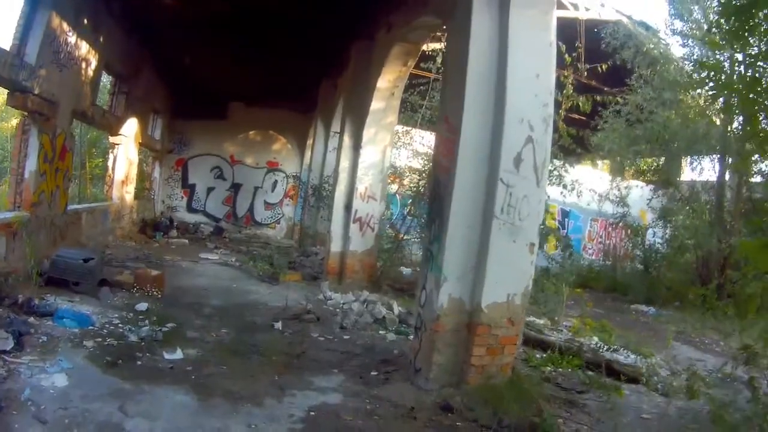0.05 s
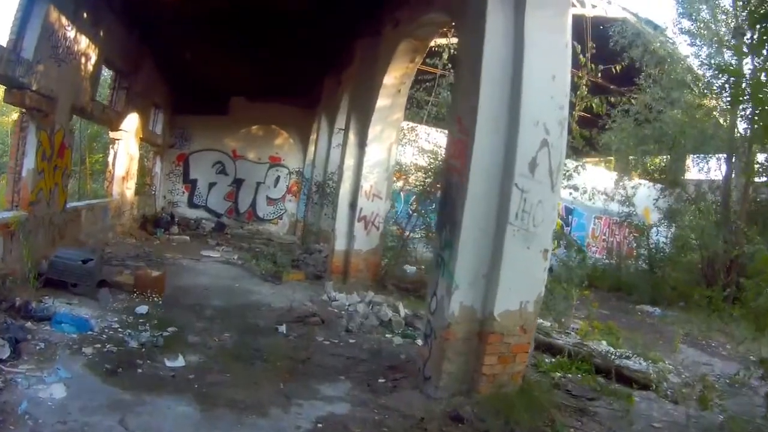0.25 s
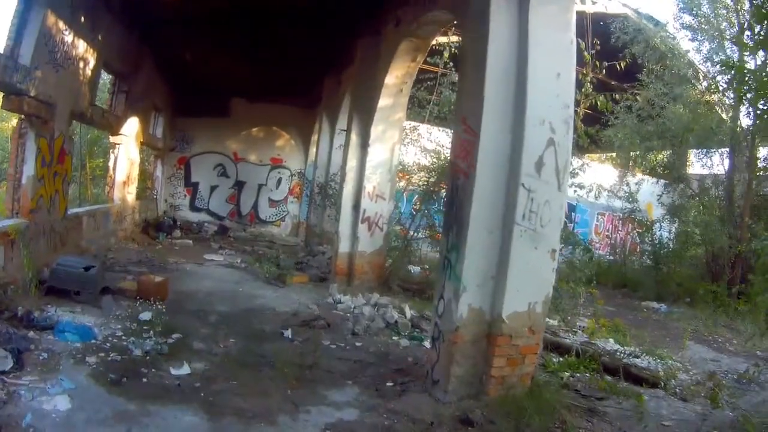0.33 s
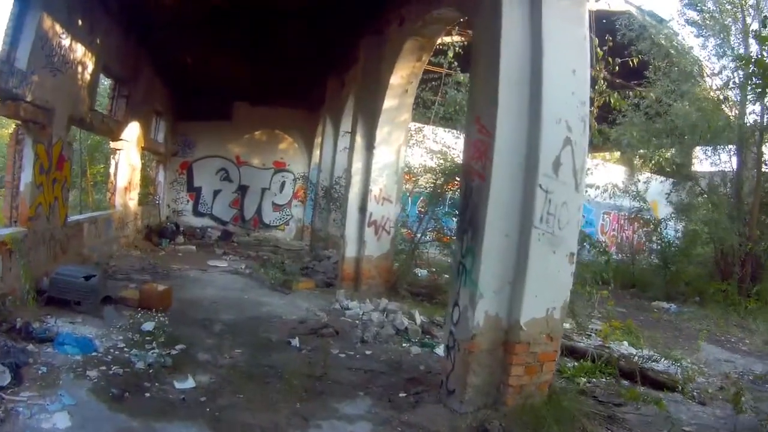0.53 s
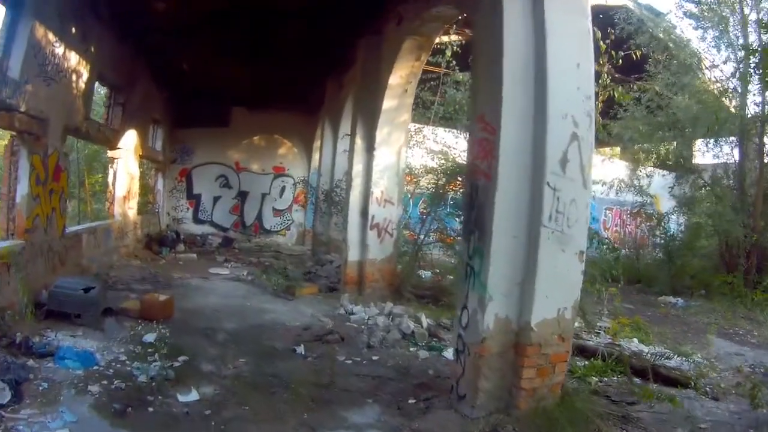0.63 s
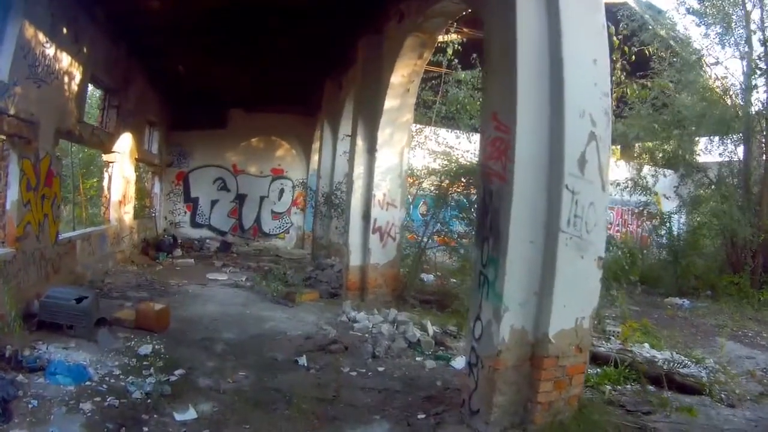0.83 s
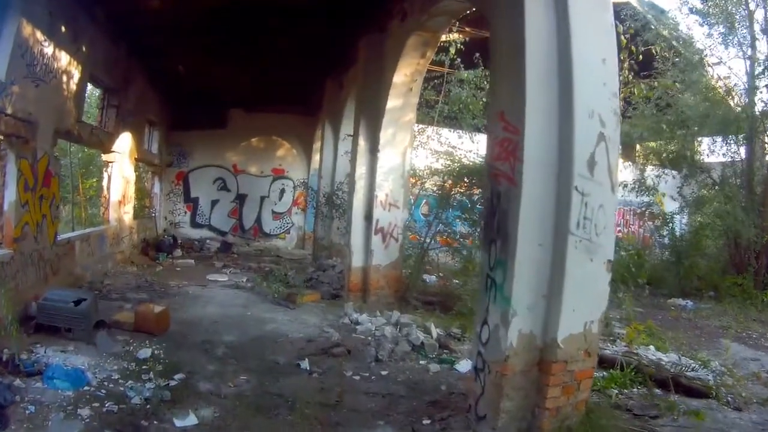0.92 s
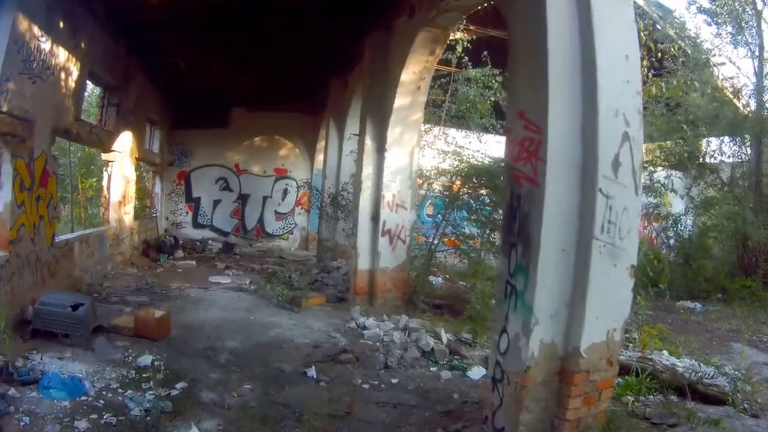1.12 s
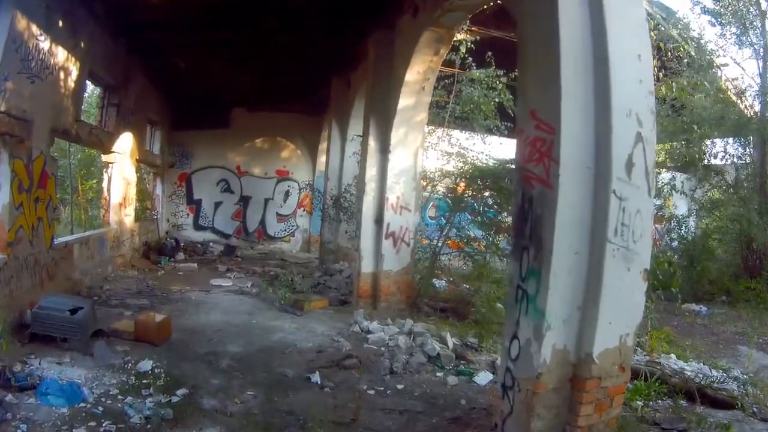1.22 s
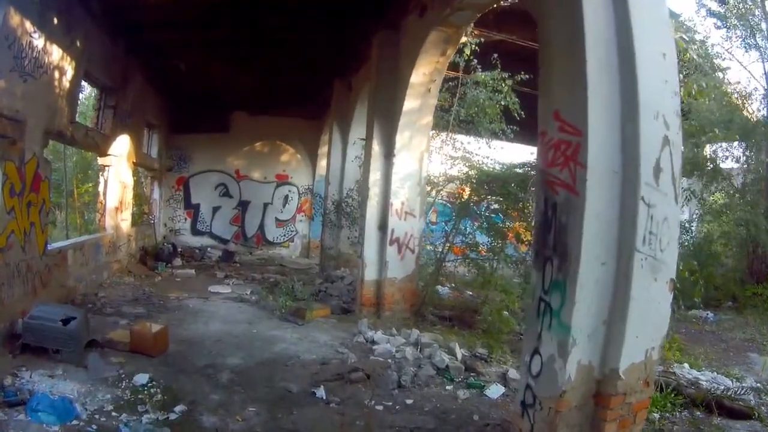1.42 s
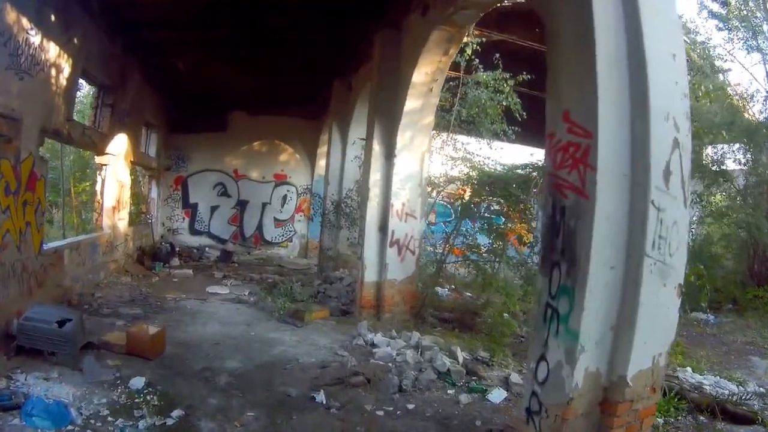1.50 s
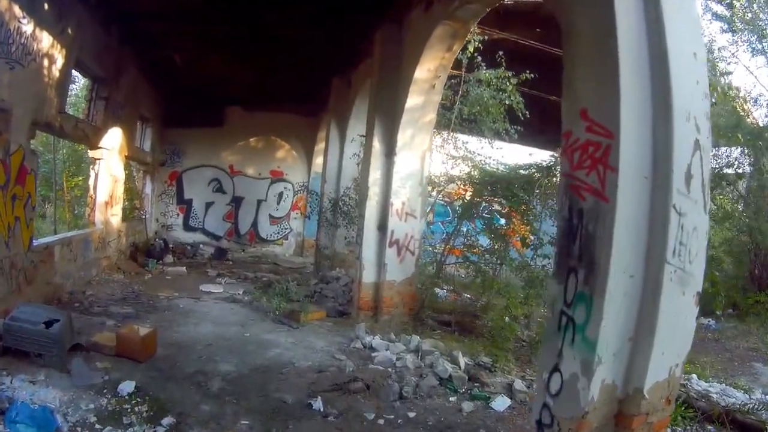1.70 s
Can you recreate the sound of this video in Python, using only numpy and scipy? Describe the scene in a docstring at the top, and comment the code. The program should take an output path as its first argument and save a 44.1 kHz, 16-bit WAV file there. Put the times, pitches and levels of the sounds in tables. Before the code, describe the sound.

A footstep scrapes over rubble and clinks a glass shard, then softer steps crunch.

```python
"""Slow steps over rubble

In a derelict brick hall, a sole scrapes through grit and flicks a glass shard, which clinks and
settles. Softer steps crush crumbs of mortar, each a tiny click, and the walls echo them.
A bird chirps thinly outside, over quiet air and a faint electronic whine."""
import sys
import numpy as np
from scipy import signal
from scipy.fft import rfft, irfft
from scipy.io import wavfile
from scipy.ndimage import uniform_filter1d

SR = 44100
rng = np.random.default_rng(int(sys.argv[2]) if len(sys.argv) > 2 else 0)


def inscribe(sig):
    """Save sig as 16-bit PCM at rate SR to the path in sys.argv[1].

    A 1-D sig is mono; a 2-D sig holds one channel per row.
    Samples are clipped to [-1, 1] before scaling.
    """
    pcm = np.round(np.clip(np.atleast_2d(sig).T, -1, 1) * 32767)
    wavfile.write(sys.argv[1], SR, pcm.astype(np.int16))


N = 77175

# A tone table says how strong each pitch is. A fade_s is the time to fall by 60 dB.
# tone of the air: pitch_hz, gain_db
AIR_TONE = [(10, -25), (18, 0), (45, -2.5), (95, -2.5), (140, -7), (310, -12.5), (485, -16.5), (718, -15.5),
            (1260, -20.5), (1480, -21), (2200, -25), (7310, -27), (9140, -24.5), (12800, -28.5),
            (13900, -22.5), (16000, -28.5)]
# notes of the whine: pitch_hz, level_db
WHINE_NOTES = [(6857, -80.5), (13714, -70.5)]
# how hard the scraping sole presses: time_s, gain_db
SCRAPE_PRESSURE = [(0, 1.5), (.05, -3), (.11, 0.5), (.17, -2.5), (.21, -5), (.235, -10.5), (.25, -6.5),
                   (.3, -14.5), (.36, -13.5), (.4, -17.5), (0.451, -26), (.54, -40)]
# tone of the scrape: pitch_hz, gain_db
SCRAPE_TONE = [(100, -31), (200, -18.5), (330, -4), (520, -5), (750, -4), (1050, -5), (1350, 1),
               (1700, -14.5), (2200, -9), (3100, -22), (3800, -14), (5600, -16.5), (7000, -11.5),
               (7800, -17.5), (9000, -5), (10000, -2.5), (10700, -14), (12200, -16), (13700, -16),
               (16000, -24)]
# hollow rings of the rubble: pitch_hz, half_width_hz, gain_db
RUBBLE_RINGS = [(514.3, 40, -51), (1282.5, 46, -47)]
# the shard striking the floor and crumbs breaking: start_s, low_db, middle_db, high_db, top_db
SHARP_CLICKS = [(0.083, -30.5, -66, -43, -49), (.16, -62, -34.5, -46, -60), (.242, -61, -29, -16.5, -33),
                (.247, -63, -29.5, -18, -41), (0.29, -43, -30.5, -31, -52), (0.328, -42, -47, -47, -59),
                (0.565, -75, -45, -57, -65), (.7465, -44, -50, -44, -50), (.817, -60, -45, -42, -53),
                (.9305, -51, -42.5, -44, -51), (1.0165, -62, -45, -56, -66),
                (1.034, -50, -46.5, -50.5, -59.5), (1.384, -66, -38, -42, -62),
                (1.3866, -48.5, -35, -40.5, -50), (1.3897, -60, -45, -38, -58),
                (1.3996, -71, -41, -39.5, -55.5), (1.4055, -39, -35, -53, -64),
                (1.4163, -71, -36, -50, -60), (1.429, -56, -43, -54, -64), (1.4574, -54, -39, -46, -58),
                (1.492, -65, -37.5, -46, -27), (1.5001, -70, -38, -46, -28), (1.5613, -45, -43, -44.5, -40),
                (1.573, -65, -39.5, -48, -56), (1.584, -53, -49, -49, -50)]
# tones of a sharp click's low, middle, high and top parts, one list each: pitch_hz, gain_db
CLICK_TONES = [
    [(80, -13), (250, -4.5), (700, 0.5), (1200, -5.5), (3000, -34)],
    [(400, -23), (1400, 2.5), (2800, -3.5), (4200, -14.5), (6500, -15), (12000, -31.5)],
    [(2000, -26), (4000, 8), (5500, -7), (7000, 3.5), (10000, 1), (13500, -25)],
    [(7000, -35), (11500, -8), (15000, 1.5)],
]
# notes the glass rings at: pitch_hz, gain_db, fade_s
GLASS_NOTES = [(8733, 0, .36), (8500, -13, .26), (8552, -13, .26), (8902, -20, .18), (8398, -28, .22),
               (3704, -1, .33), (3618, -5, .28), (4872, -6.5, .23), (9250, -32, .15), (11020, -38, .15),
               (13290, -35, .2), (14720, -36, .25)]
# hits on the glass: start_s, high_db, middle_db, low_db, free_ring_s, chatter_s, first_note_extra_db
CLINKS = [(.105, -21, -54, -43.5, 0.011, 0.03, -24), (.162, -34, -42, -47.5, 0.015, .043, -27),
          (.2424, -12, -33, -33.5, 0.018, .045, 2), (.289, -27.5, -44, -41, 0.038, 0.019, -1),
          (.326, -40, -36, -45.5, 0.0044, 0.01, -10), (.3368, -18, -40, -45.5, .011, 0.047, -18),
          (.372, -35, -51, -47, 0.0013, 0.021, -13), (.413, -45, -66, -52.5, 0.0015, 0.021, -2)]
# weight landing on the floor: start_s, length_s, level_db
THUDS = [(0.105, .026, -50.5), (0.256, 0.028, -50)]
# mortar being crushed: start_s, rise_s, hold_s, fade_s, low_db, middle_db, high_db
CRUNCHES = [(0.157, 0.0024, 0.003, 0.088, -55, -46, -50), (.251, 0.0024, 0.0053, 0.12, -58, -52, -40),
            (0.294, 0.0013, 0.0034, 0.099, -56, -47.5, -42), (0.324, 0.0029, 0.01, 0.23, -66, -53.5, -47),
            (1.464, .001, .004, 0.025, -72, -66, -51.5), (0.526, 0.013, 0.078, 0.67, -68.5, -68.5, -71),
            (0.718, .011, 0.036, 0.38, -64.5, -67, -67.5), (0.763, .021, .2, 0.6, -69.5, -66.5, -67.5),
            (1.244, 0.022, 0.059, 0.18, -73, -75, -82.5), (1.389, 0.0043, 0.034, 0.29, -65.5, -54, -60),
            (1.447, 0.014, 0.054, .51, -64.5, -61.5, -56), (1.564, 0.0091, 0.018, 1, -64, -65.5, -61.5)]
# tones of the low, middle and high grit: pitch_hz, gain_db
GRIT_LOW_TONE = [(80, -18.5), (250, 0), (700, -3), (1200, -11), (3000, -43.5)]
GRIT_MIDDLE_TONE = [(400, -20), (1000, 2.5), (1550, -2), (2200, 0), (3000, -9), (4300, -7), (6000, -16),
                    (12000, -52)]
GRIT_HIGH_TONE = [(1500, -30.5), (4000, 3), (5500, -3), (7000, 6.5), (9700, 6), (12000, -2), (16000, 0)]
# twists of the sole: start_s, length_s, pitch_hz, gain_db
GRINDS = [(0.623, .11, 1468, -67), (0.765, 0.063, 1566, -59), (0.801, .21, 1463, -65.5),
          (1.015, 0.1, 1455, -72), (1.237, .055, 1570, -65), (1.285, .045, 1500, -61.5),
          (1.41, 0.034, 1670, -46)]
# the bird's glides, one list per chirp: time_s, pitch_hz, level_db
CHIRPS = [
    [(.79, 8620, -74), (.805, 8900, -60), (.819, 9600, -55), (.829, 9500, -57), (.841, 9250, -60),
     (.855, 9000, -65), (.867, 8650, -66), (.888, 9070, -62.5), (.917, 9050, -62), (.98, 8650, -67)],
    [(1.535, 10500, -64), (1.548, 10000, -63), (1.565, 9200, -63)],
    [(1.672, 9100, -68.5), (1.69, 9180, -65), (1.712, 9000, -66), (1.735, 8950, -74)],
]
# the heel touching down: start_s, gain_db
HEEL_TAPS = [(1.361, -44), (1.371, -53)]
# notes in a heel tap: pitch_hz, gain_db, fade_s
HEEL_NOTES = [(175, -2, 0.021), (336, -4.5, 0.013), (630, -5, 0.0084)]


def undb(db):
    """Turn decibels into a number to multiply by."""
    return 10 ** (np.asarray(db) / 20)


def unit(x):
    """Scale a signal to an average strength (rms) of 1."""
    return x / np.sqrt(np.mean(x ** 2))


def clock():
    """The time of each sample, in seconds."""
    return np.arange(N) / SR


def shape_tone(x, tone):
    """Filter a sound so that its pitches follow a tone table."""
    hz, db = np.array(tone).T
    all_hz = np.maximum(np.arange(N + 1) * SR / (2 * N), 1)
    gain = undb(np.interp(np.log(all_hz), np.log(hz), db))
    # fold the filter so that it rings only after a click, never before
    folded = irfft(np.log(gain))
    folded[1:N] *= 2
    folded[N + 1:] = 0
    return irfft(rfft(x, 2 * N) * np.exp(rfft(folded)))[:N]


def resonate(x, hz, width_hz):
    """Make a sound ring around one pitch."""
    return signal.lfilter(*signal.iirpeak(hz, hz / width_hz, fs=SR), x)


def narrow_band(x, hz, width_hz):
    """Ring twice at one pitch, then scale to strength 1."""
    return unit(resonate(resonate(x, hz, width_hz), hz, width_hz))


def wobble(rate_hz):
    """A smooth random wander of strength 1."""
    return unit(signal.sosfilt(signal.butter(2, rate_hz, fs=SR, output="sos"), rng.standard_normal(N)))


def grains(per_s=9000, scatter_db=3):
    """Grit breaks in many tiny clicks, a few much louder than the rest."""
    size = undb(scatter_db * np.minimum(rng.exponential(size=N), 5))
    return (rng.random(N) < per_s / SR) * size * rng.choice([-1, 1], N)


def background():
    """Quiet air hisses over a far rumble."""
    air = undb(-60 + .5 * wobble(3.02)) * unit(shape_tone(rng.standard_normal(N), AIR_TONE))
    rumble = narrow_band(rng.standard_normal(N), hz=72.7, width_hz=14.45)
    return air + undb(-69) * rumble


def whine():
    """The camera's electronics give off two thin, steady notes."""
    return sum(np.sqrt(2) * undb(db) * np.sin(2 * np.pi * hz * clock()) for hz, db in WHINE_NOTES)


def scrape(grit_db=-39.5, glass_db=-52):
    """Grit rolls under the sole, ringing the rubble and rubbing the shard."""
    out = undb(grit_db) * unit(shape_tone(grains(), SCRAPE_TONE))
    for hz, half_width, db in RUBBLE_RINGS:
        out += undb(db) * narrow_band(grains(), hz, 2 * half_width)
    rub = grains()
    glass = sum(resonate(rub, hz, width_hz=36) for hz, _, _ in GLASS_NOTES)
    pressure = undb(np.interp(clock(), *np.array(SCRAPE_PRESSURE).T))
    return (out + undb(glass_db) * unit(glass)) * pressure


def hall_echo(x, low_fade_s=.36, high_fade_s=.26, delay_s=.023):
    """The brick walls throw back a blur of echoes; the high pitches die first."""
    t, noise = clock(), rng.standard_normal(N)
    low = signal.sosfilt(signal.butter(2, 3000, fs=SR, output="sos"), noise)
    tail = low * undb(-60 * t / low_fade_s) + (noise - low) * undb(-60 * t / high_fade_s)
    tail *= t > delay_s
    return signal.fftconvolve(x, tail / np.sqrt(np.sum(tail ** 2)))[:N]


def sharp_clicks(noise_gain=.11, decay_s=.0014):
    """The shard strikes the floor and crumbs break: each is a sharp click with a tiny tail of noise."""
    t, out = clock(), np.zeros(N)
    for part, tone in enumerate(CLICK_TONES):
        clicks = np.zeros(N)
        for start, *part_db in SHARP_CLICKS:
            burst = noise_gain * rng.standard_normal(N) * np.exp(-t / decay_s)
            burst[0] = 1  # the click itself
            i = int(start * SR)
            clicks[i:] += undb(part_db[part]) * burst[:N - i] / np.sqrt(np.sum(burst ** 2))
        click_peak = np.abs(shape_tone(signal.unit_impulse(N), tone)).max()
        out += shape_tone(clicks, tone) / click_peak
    return out


def glass_shard(rise_s=.002, stop_s=.004, muffle_s=.0043, press_s=.006):
    """Hit glass rings until the sole muffles its high notes; lower ones chatter until pressed still."""
    t, out = clock(), np.zeros(N)
    ends = [row[0] for row in CLINKS[1:]] + [t[-1]]  # each hit stops the one before
    still_ringing = undb(-14)
    for (start, high_db, middle_db, low_db, free_s, chatter_s, first_db), end in zip(CLINKS, ends):
        age = np.maximum(t - start, 0)
        on_off = (1 - np.exp(-age / rise_s)) * np.exp(-np.maximum(t - end, 0) / stop_s)
        free = np.exp(-np.maximum(age - free_s, 0) / muffle_s)
        high = undb(high_db) * (still_ringing + (1 - still_ringing) * free)
        chatter = undb(2.5 * wobble(55)) * np.exp(-np.maximum(age - chatter_s, 0) / press_s)
        for k, (hz, db, fade_s) in enumerate(GLASS_NOTES):
            waver = 1 + .16 * (wobble(73.6) + 1j * wobble(73.5))  # in loudness and pitch
            ring = (np.exp(2j * np.pi * hz * age) * waver).imag
            size = undb(db + first_db * (k == 0) - 60 * age / fade_s)
            contact = high if hz > 6000 else chatter * undb(middle_db if hz > 4300 else low_db)
            out += ring * size * on_off * contact
    return out


def thuds(pitch_hz=76):
    """The walker's weight lands on the floor: a few soft, deep swings."""
    out = np.zeros(N)
    for start, length, db in THUDS:
        age = np.clip(clock() - start, 0, length)
        out += undb(db) * np.sin(np.pi * age / length) * np.sin(2 * np.pi * pitch_hz * age)
    return out


def crunches():
    """Weight comes onto the mortar crumbs, stays and eases off."""
    t, out = clock(), np.zeros(N)
    for part, tone in enumerate([GRIT_LOW_TONE, GRIT_MIDDLE_TONE, GRIT_HIGH_TONE]):
        power = np.zeros(N)
        for start, rise, hold, fade_s, *part_db in CRUNCHES:
            press = np.clip((t - start) / rise, 0, 1)
            drop_db = 60 * np.maximum(t - start - rise - hold, 0) / fade_s
            power += (press * undb(part_db[part] - drop_db)) ** 2
        out += np.sqrt(power) * unit(shape_tone(grains(per_s=3000, scatter_db=2), tone))
    return out


def grinds(ramp_s=.034):
    """The sole twists on the concrete; its tiny rubbing clicks ring around one pitch."""
    t, out = clock(), np.zeros(N)
    for start, length, hz, db in GRINDS:
        press = np.clip(np.minimum(t - start, start + length - t) / ramp_s, 0, 1)
        out += undb(db) * press * narrow_band(grains(), hz, width_hz=235)
    return out


def bird(upper_ratio=1.11, upper_db=-9):
    """A bird sings thin, gliding whistles with a weaker second voice above."""
    t, out = clock(), np.zeros(N)
    for chirp in CHIRPS:
        times, hz, db = np.array(chirp).T
        pitch = uniform_filter1d(np.interp(t, times, hz), size=300) * (1 + .0028 * wobble(200))
        phase = 2 * np.pi * np.cumsum(pitch) / SR
        singing = (t > times[0]) * (t < times[-1])
        loudness = uniform_filter1d(undb(np.interp(t, times, db)) * singing, size=300)
        voices = np.sin(phase) + undb(upper_db) * np.sin(upper_ratio * phase)
        out += loudness * (1 + .16 * wobble(90)) * voices
    return out


def heel_taps():
    """The heel hits the concrete with dull notes that die quickly."""
    out = np.zeros(N)
    for start, tap_db in HEEL_TAPS:
        age = np.maximum(clock() - start, 0)
        for hz, db, fade_s in HEEL_NOTES:
            out += undb(tap_db + db - 60 * age / fade_s) * np.sin(2 * np.pi * hz * age)
    return out


def scene():
    """Feet and glass close by, the hall around them and the bird outside."""
    feet = scrape() + grinds() + crunches() + sharp_clicks() + heel_taps() + thuds()
    glass = glass_shard()
    echo = hall_echo(undb(-15) * feet + undb(-14) * glass)
    return (feet + glass + echo + bird() + background())[None]


def record(dry):
    """Add the whine and cut off the very highest pitches."""
    top_hz = 15750
    return signal.sosfilt(signal.ellip(10, .2, 80, top_hz, fs=SR, output="sos"), dry + whine())


dry = scene()
out = record(dry)
inscribe(out)
```